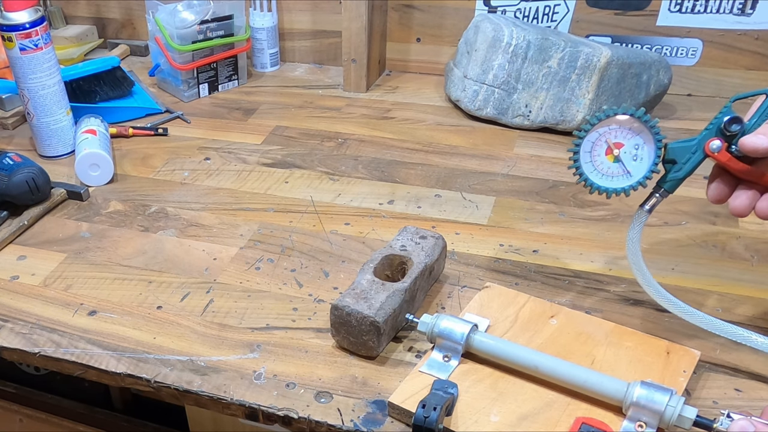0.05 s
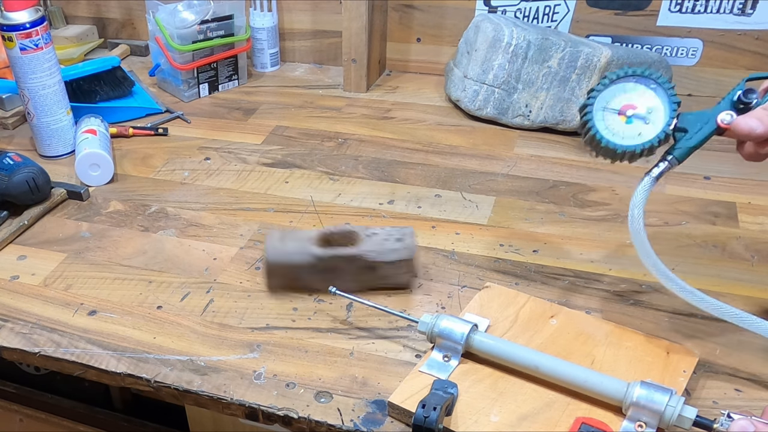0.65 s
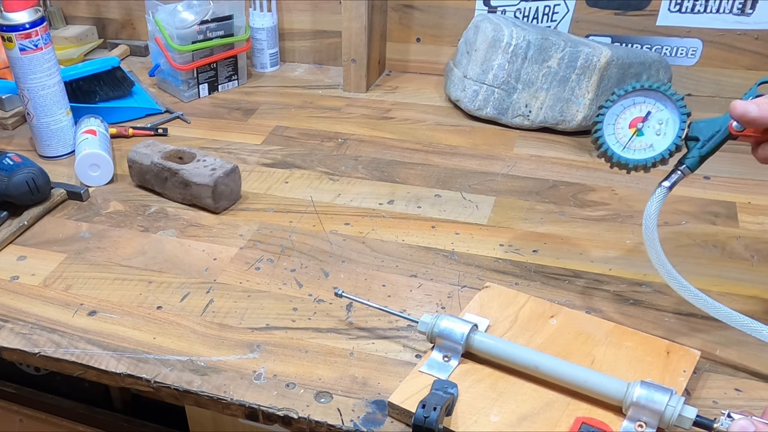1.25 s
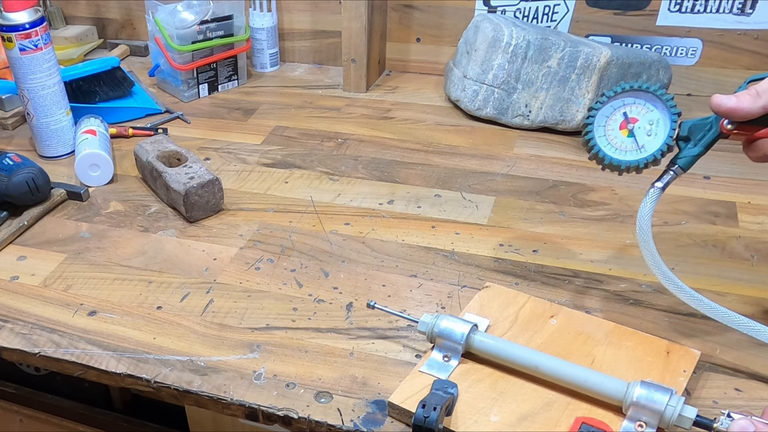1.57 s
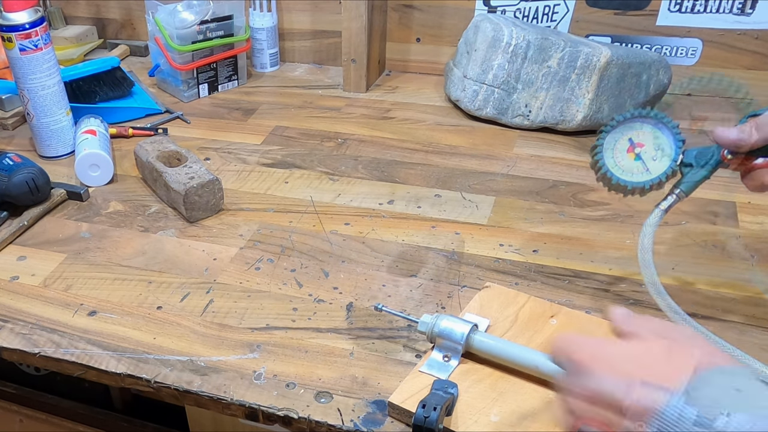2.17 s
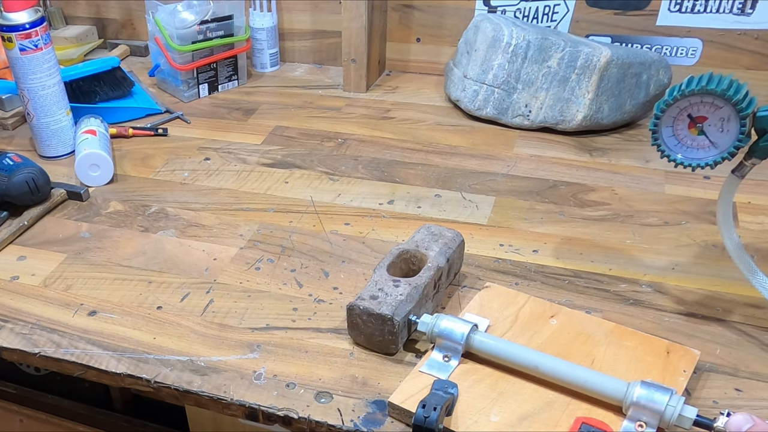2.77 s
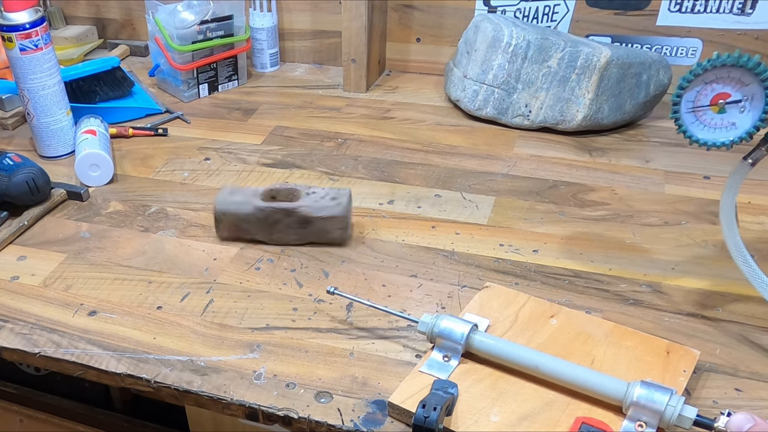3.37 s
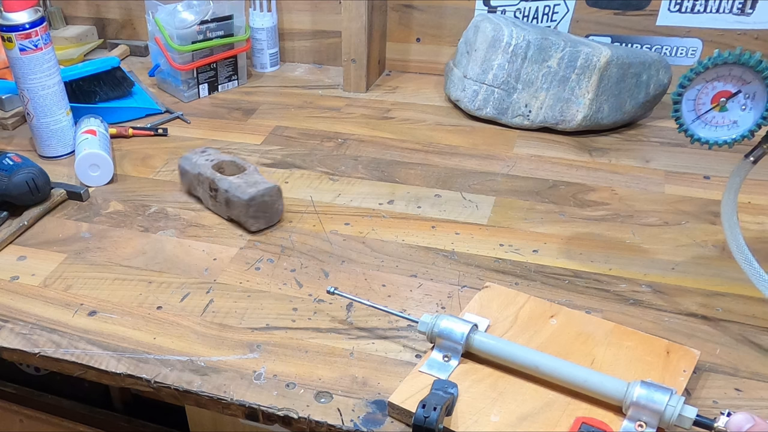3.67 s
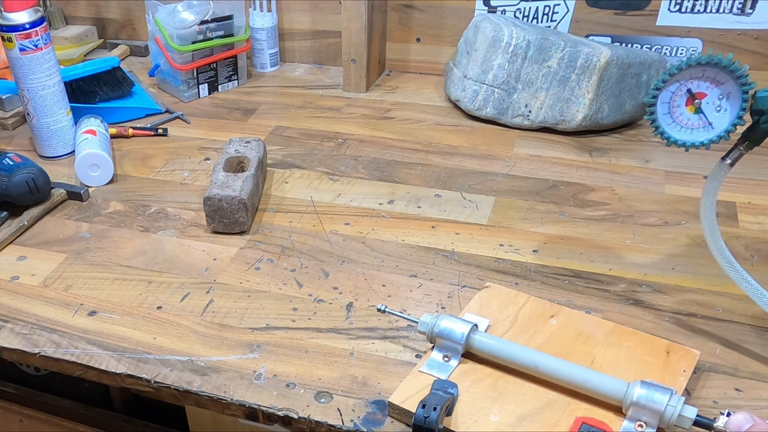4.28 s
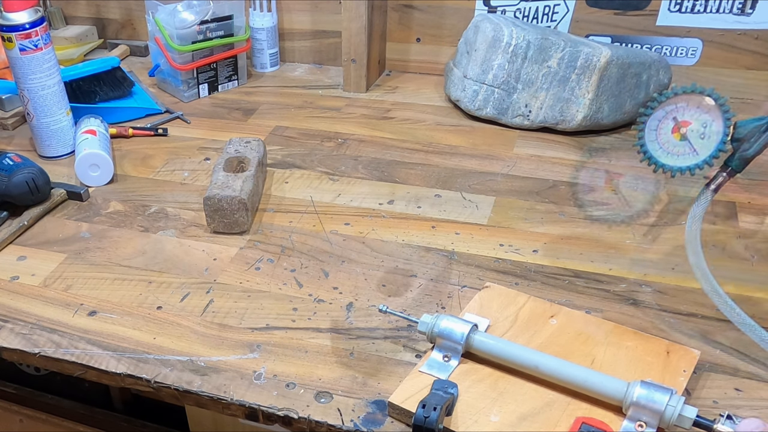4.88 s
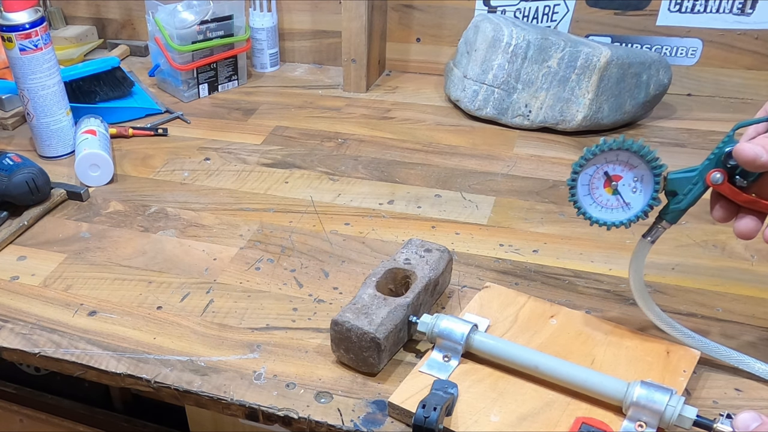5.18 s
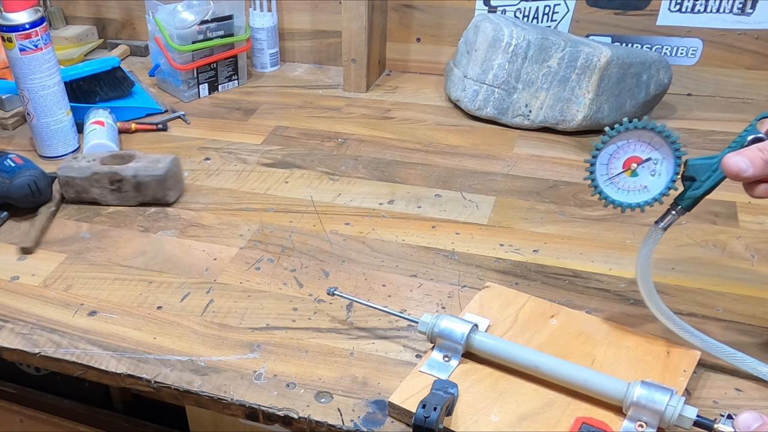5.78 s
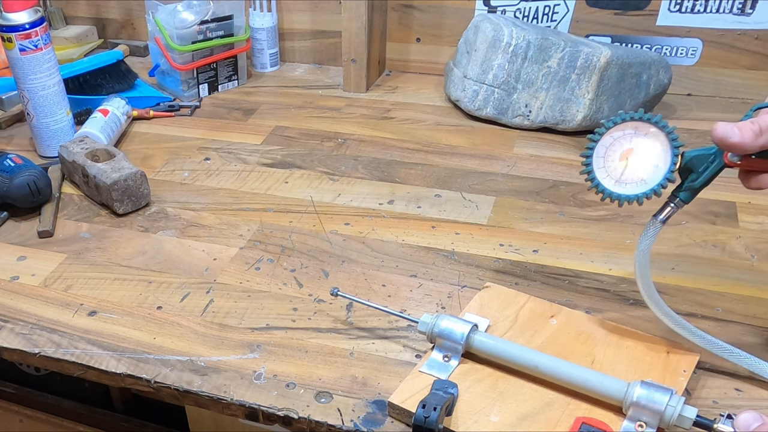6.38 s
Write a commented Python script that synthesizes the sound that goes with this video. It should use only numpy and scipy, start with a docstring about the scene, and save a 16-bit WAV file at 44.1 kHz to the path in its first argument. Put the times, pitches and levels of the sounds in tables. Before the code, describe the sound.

A small compressor hums briefly, then an air piston strikes steel with a clank, a hiss and a wooden scrape, three times over.

```python
"""A quiet workshop, a stereo microphone close to a wooden bench where a spring-return air cylinder shoots
a steel hammer head across the top, three times. Before each shot a little compressor labours and slows.
Air leaks past the piston, the rod strikes, the spring rattles, and the head thumps and slides; it rings
on the first shot, and on the last when it crashes into some tools. After each shot the air vents and
the rod slides home."""
import sys
import numpy as np
from scipy import signal
from scipy.fft import rfft, irfft
from scipy.io import wavfile
from scipy.ndimage import uniform_filter1d

SR = 44100
rng = np.random.default_rng(int(sys.argv[2]) if len(sys.argv) > 2 else 0)


def pcm_store(signal):
    """Save signal as 16-bit PCM."""
    levels = np.round(np.clip(np.atleast_2d(signal), -1, 1) * 32767)
    wavfile.write(sys.argv[1], SR, levels.astype(np.int16).T)


N = 288414
TIME = np.arange(N) / SR
FREQ = np.maximum(np.fft.rfftfreq(N, 1 / SR), 1)


def amp(db):
    """Decibels as a gain."""
    return 10 ** (np.asarray(db) / 20)


def unit(x):
    """Scale to rms 1."""
    return x / np.sqrt(np.mean(x ** 2))


def since(s):
    """Seconds gone by since time s, zero before it."""
    return np.maximum(TIME - s, 0)


def ramp(s, length):
    """Straight rise from 0 to 1 that begins at time s."""
    return np.minimum(since(s) / length, 1)


def coast(s, length, attack, power):
    """Loudness of something set moving at time s and braked evenly by friction: a power of its speed."""
    return ramp(s, attack) * (1 - ramp(s, length)) ** power


def add(track, s, sound):
    """Mix a sound into the track at time s."""
    i = int(s * SR)
    track[i:i + len(sound)] += sound[:N - i]


def colour(x, points, tilt_db=0):
    """Minimum-phase filter through points of Hz and dB, tilted by dB per octave."""
    hz, db = np.transpose(points)
    octaves = np.log2(np.clip(FREQ, 400, 12000) / 2000)
    gain_db = np.interp(np.log(FREQ), np.log(hz), db) + tilt_db * octaves
    cepstrum = irfft(np.log(amp(gain_db)), N)[:2048]
    cepstrum[1:] *= 2
    impulse = irfft(np.exp(rfft(cepstrum, 8192)))[:4096]
    return signal.oaconvolve(x, impulse)[:len(x)]


def noise(spectrum):
    """Steady noise of the given colour, rms 1."""
    return unit(colour(rng.standard_normal(N), spectrum))


def flutter(rate):
    """Smooth random wandering with spread 1."""
    k = int(SR / rate)
    steps = np.repeat(rng.standard_normal(N // k + 1), k)
    return unit(uniform_filter1d(steps, k)[:N])


def contacts(spectrum, per_s, scatter_db):
    """A swarm of tiny random contacts of uneven size, rms 1."""
    clicks = (rng.random(N) < per_s / SR) * rng.choice([-1, 1], N)
    sizes = amp(scatter_db * np.clip(rng.standard_normal(N), -2, 2))
    return unit(colour(clicks * sizes, spectrum))


def place(x, left_db, wet_db, lag_samples=2.17):
    """Sound reaches the right microphone first; bench, wall and shelves answer, alike in the bass."""
    t, t60 = TIME[:SR // 2], 0.2
    early_boost = 1 + 2 * np.exp(-t / 0.013)
    mid, side = rng.standard_normal((2, len(t))) * amp(-60 * t / t60) * (t > .002) * early_boost
    side = 0.12 * side + signal.sosfilt(signal.butter(1, 800, "high", fs=SR, output="sos"), side)
    room = [signal.oaconvolve(x, h / np.linalg.norm(h))[:N] for h in (mid + side, mid - side)]
    taps = np.arange(-16, 17)
    left = np.convolve(x, np.sinc(taps - lag_samples) * np.hanning(len(taps)), "same")
    balance = amp([[left_db / 2], [-left_db / 2]])
    return (np.array([left, x]) + amp(wet_db) * np.array(room)) * balance


def room_air(level_db, side_db, swell_db):
    """Quiet air all around the microphones, partly alike at both, swelling a little."""
    # The room's spectrum. Each row: frequency in Hz, level in dB.
    spectrum = [(12, -41.5), (20, -16.5), (38, -2), (59, -2), (108, -32.5), (139, -12.5), (256, -15),
                (445, -25), (1110, -25), (4080, -42), (15000, -53)]
    mid, side = noise(spectrum), noise(spectrum)
    return (mid + amp(side_db) * side * np.array([[1], [-1]])) * amp(level_db + swell_db * flutter(8.2))


def compressor():
    """One stroke per shaft turn: overtones slide down through the body, the valve puffs and whistles."""
    # Runs of the pump. Each row: start, stall and end in seconds, level of the tone in dB.
    runs = [(0, 0.499, .66, -45.5), (2.27, 2.791, 3.16, -46), (4.987, 5.314, 5.39, -47)]
    # Resonances of the body, then of valve and casing. Each row: centre in Hz, width in Hz, gain in dB.
    body_modes = [(43.1, 20, -5.5), (86, 9.5, -18.5), (211.2, 12, 0), (312, 26, -2.5), (444, 33, -17),
                  (654, 40, -14.5), (718, 62, -26.5)]
    valve_modes = [(167, 60, 3), (700, 100, 0.5), (1325, 480, -6.5), (2220, 210, 2.5), (2935, 130, -8),
                   (3418, 610, -9.5), (4510, 740, -4), (5140, 46, -6), (5700, 30, -9), (7300, 1500, -26.5)]
    free_hz, sag_hz, sag_s = 44.91, 6.8, .36
    whistle_hz, puff_depth = 4150, 0.47
    hum, overtones, valve = np.zeros((3, N))
    flow = colour(rng.standard_normal(N), [(6000, -4.0), (15000, -7.5)])
    hiss = unit(sum(amp(db) * signal.lfilter(*signal.iirpeak(hz, hz / width, fs=SR), flow)
                    for hz, width, db in valve_modes))
    whistle = np.sin(2 * np.pi * np.cumsum(whistle_hz + 9 * flutter(60)) / SR)
    for start, stall, end, run_db in runs:
        on = (TIME >= start) & (TIME < end)
        past_stall = TIME[on] - stall
        # The shaft slows ever faster as the pressure builds; the tone collapses at the stall.
        shaft_hz = np.maximum(free_hz - sag_hz * np.exp(past_stall / sag_s), 10)
        tone_db = run_db - 15 * (1 + np.tanh(past_stall / 0.046)) / 2
        turn = 2 * np.pi * np.cumsum(shaft_hz) / SR
        for k in range(1, 20):
            body = sum(amp(db) / (1 + 2j * (k * shaft_hz - hz) / width) ** 1.58
                       for hz, width, db in body_modes)
            phase = k * turn + rng.uniform(0, 2 * np.pi)
            track = hum if 3 < k < 12 else overtones
            track[on] += amp(tone_db) * np.imag(body * np.exp(1j * phase))
        puffs = 1 - puff_depth * np.sin(turn)
        valve[on] = hiss[on] * amp(-57) * (shaft_hz / free_hz) ** 0.96 * puffs
        overtones[on] += whistle[on] * amp(tone_db - 12.5) * (shaft_hz / shaft_hz[0]) ** 26
    # The low hum stands in the room and is much louder at the right microphone.
    return hum * amp([[-5], [4.5]]) + overtones * amp([[-1], [1]]) + place(valve, left_db=-1, wet_db=-1.3)


def jet(flows, spectrum, flutter_db):
    """Turbulent air through a narrow gap; each flow is a gain and the level of its top end in dB."""
    hiss = noise(spectrum)
    top = irfft(rfft(hiss) / (1 + (8000 / FREQ) ** 8), N)
    air = sum(gain * (hiss - top + amp(treble_db) * top) for gain, treble_db in flows)
    return air * amp(flutter_db * flutter(70))


def wide_hiss(air):
    """The very top of the hiss is diffuse and wide, differing between left and right."""
    top = irfft(rfft(air) / (1 + (10800 / FREQ) ** 16), N)
    return place(air - top, left_db=-0.74, wet_db=-4.5) + amp(-4) * place(top, left_db=-0.5, wet_db=5)


def piston_leak():
    """Air past the piston surges with the stroke, then sinks with the pressure or as the seal seats."""
    # Shots. Each row: valve opening and closing in seconds, level in dB, fall in dB/s, treble in dB.
    shots = [(0.655, 1.443, -27, 16, -9), (3.16, 4.04, -29, 12.5, -10), (5.378, 6.47, -29.5, -1.5, -10.5)]
    # The leak's spectrum. Each row: frequency in Hz, level in dB.
    spectrum = [(100, -15.5), (400, -23), (800, -28.5), (1400, -11), (2200, -6), (3200, -3.5), (4500, -0.5),
                (5600, -1), (7000, -2), (9000, 1), (12000, -4.5), (15000, -19.5)]
    treble_hold = 0.33  # share of the fall that the top of the hiss is spared
    seal_db = 19.5 * (1 - np.exp(-since(5.8) / 0.18))  # the seal seats during the last shot
    flows = []
    for opens, closes, db, fall_db_per_s, treble_db in shots:
        age = since(opens)
        surge_db = 3.5 * np.exp(-age / 0.1)
        fall_db = fall_db_per_s * age + seal_db
        gate = ramp(opens, 0.029) * np.exp(-since(closes) / .02)
        flows.append((gate * amp(db + surge_db - fall_db), treble_db + treble_hold * fall_db))
    return jet(flows, spectrum, flutter_db=0.3)


def knocks(snap, t60):
    """Each blow is a sharp contact and a crack that dies quickly; it also shakes the cylinder's mount."""
    # Blows. Each row: start in seconds, level in dB, tilt in dB per octave, relative clack in dB.
    blows = [(0.6721, -2, 3, -17.5), (.676, -9, -5.5, -22), (1.481, -18.5, 11, -32.5),
             (2.043, -51.5, -13, -35), (3.103, -45, 6, -28), (3.169, -22, 1.5, -9.5), (3.18, -14.5, -4, -9),
             (3.184, -11, 6, -11), (3.228, -14, 4, -23), (3.437, -29, -6, -18), (3.451, -24, -12, -18),
             (4.037, -19, 17, -23), (4.07, -12.5, 7.5, -15.5), (5.3932, -23, -4, -16), (5.3996, -25, -4, 2),
             (5.4041, -12.5, -1.5, -9), (5.467, -9, 3, -21), (5.8156, -1.5, -3.5, -48.5),
             (5.835, -5.5, -4, -24), (5.8561, -10.5, -2.5, -12), (5.888, -13, -2, -25),
             (5.9208, -13.5, -4.5, -22), (5.98, -21, -5, -21), (6.055, -24, 7, -22)]
    # The crack's spectrum. Each row: frequency in Hz, level in dB.
    spectrum = [(100, -18.5), (300, -15.5), (700, -18), (1300, -1), (2000, -1.5), (3000, 1), (4200, -6.5),
                (5500, -2.5), (7500, -12), (11000, -24.5), (15000, -43)]
    # The cylinder on its bracket and board. Each row: mode in Hz, level in dB, t60 in seconds.
    mount_modes = [(1260, -7, 0.04), (1397, 1, 0.09), (1600, 1, 0.065), (1846, -1, 0.14), (2098, -7, 0.05),
                   (3480, -10.5, 0.046), (5700, -13.5, .04)]
    out, t = np.zeros(N), TIME[:SR // 6]
    for s, db, tilt_db, clack_db in blows:
        force = rng.standard_normal(len(t)) * amp(-60 * t / t60)
        force[0] += snap
        crack = colour(force, spectrum, tilt_db)
        clack = sum(amp(mode_db - 60 * t / ring_s) * np.sin(2 * np.pi * hz * rng.normal(1, 0.012) * t)
                    for hz, mode_db, ring_s in mount_modes)
        add(out, s, amp(db) * (crack / np.abs(crack).max() + amp(clack_db) * clack / 2))
    return out


def head_ring(slowing_s, left_lag_rad):
    """The head rings in high modes; as it spins, their lobes sweep past each microphone and beat."""
    # Blows. Each row: start in seconds, level in dB, spot (0 side, 1 corner), spin in Hz, beat depth.
    blows = [(0.6746, -3, 0.1, 22, 0.93), (5.8156, -2.5, 1, 14, 0.49)]
    # The steel head. Each row: mode in Hz, dB struck on the side, dB struck on a corner, t60 in seconds.
    steel_modes = [(6900, -35, -51.5, .6), (7215, -18.5, -19, 0.81), (8784, -21, -29, .5),
                   (9522, -59, -27.5, 1.0), (12880, -44.5, -52, .25), (14770, -70.5, -56, .8)]
    out, t = np.zeros((2, N)), TIME[:SR]
    for s, db, corner, spin_hz, depth in blows:
        angle = 2 * np.pi * spin_hz * slowing_s * (1 - np.exp(-t / slowing_s))
        for hz, side_db, corner_db, t60 in steel_modes:
            fade = amp(db + side_db + corner * (corner_db - side_db) - 60 * t / t60)
            for channel, phase in zip(out, (-left_lag_rad, 0)):
                lobes = 1 + depth * np.cos(angle + rng.uniform(0, 2 * np.pi))
                add(channel, s, fade * lobes * np.sin(2 * np.pi * hz * t + phase))
    return out


def sliding(attack_s, judder_db):
    """Steel catches on the grain of the wood in many tiny slips, and the bench rumbles under it."""
    # Head or rod sliding to a stop. Each row: start and length in seconds, scrape and rumble in dB.
    slides = [(0.678, 0.8, -32, -30), (1.185, 0.5, -45.5, -62), (1.451, 0.22, -30, -31.5),
              (3.044, 0.4, -59.5, -41), (3.188, 0.89, -32, -28), (4.032, 0.27, -34, -40),
              (5.406, 0.79, -33, -30.5), (5.803, 0.29, -32, -28), (6.488, 0.29, -37, -47)]
    # Spectra of scrape and rumble. Each row: frequency in Hz, level in dB.
    scrape_spectrum = [(90, -15), (170, -3.5), (230, -4.5), (305, 1), (400, -2), (500, -1), (750, -7.5),
                       (1100, -4.5), (1500, -2.5), (1950, -11.5), (3000, -13.5), (6000, -24)]
    rumble_spectrum = [(20, -28), (45, -5), (80, -1), (120, -8), (180, -16), (400, -47.5)]
    scrape_gain = sum(amp(db) * coast(s, length, attack_s, power=1.595) for s, length, db, _ in slides)
    rumble_gain = sum(amp(db) * coast(s, length, attack_s, power=2.34) for s, length, _, db in slides)
    scrape = contacts(scrape_spectrum, per_s=2500, scatter_db=4.5) * amp(judder_db * flutter(60))
    return scrape * scrape_gain + noise(rumble_spectrum) * rumble_gain


def spring_rattle():
    """The spring's coils clash in a swarm that swells and dies around the end of each stroke."""
    # Clashes. Each row: loudest moment in seconds, level in dB, spread in seconds.
    clashes = [(0.729, -18, 0.0085), (1.481, -19.5, 0.0064), (3.231, -18.5, 0.013), (4.068, -22, 0.014),
               (5.463, -17.5, 0.015), (6.496, -23, 0.013)]
    # The coils' spectrum. Each row: frequency in Hz, level in dB.
    spectrum = [(150, -13.5), (400, -6.5), (800, -6), (1400, 0), (2100, -4.5), (3200, 3), (4200, 0.5),
                (5400, 5), (7000, -16), (9000, -11.5), (12000, -20.5), (15000, -30.5)]
    swell = sum(amp(db) * np.exp(-np.minimum(((TIME - s) / spread) ** 2, 50) / 2)
                for s, db, spread in clashes)
    return swell * contacts(spectrum, per_s=4000, scatter_db=6.2)


def bench_thumps():
    """A half-sine push bends the bench top; a longer contact leaves only its lowest modes."""
    # The heavy head landing. Each row: start in seconds, peak in dB, contact time in seconds.
    landings = [(0.751, -14, 0.0036), (0.761, -16.5, 0.0035), (.915, -35, 0.0055), (3.225, -28, 0.0058),
                (3.249, -17, 0.0024), (3.334, -23, 0.0048), (3.446, -39, 0.0012), (3.549, -26, 0.0026),
                (3.626, -29, 0.0047), (5.509, -12, 0.0053), (5.555, -13, 0.0023)]
    # The bench top. Each row: mode in Hz, level in dB, t60 in seconds.
    bench_modes = [(73.2, 8, 0.23), (76.4, -0.5, 0.24), (112.5, -16, .14), (140, -12.5, 0.14),
                   (181.2, -19, .15), (289.4, -16.5, 0.1374), (322, -2.5, 0.61), (488, -17.5, .1),
                   (565, -11, .12)]
    out, t = np.zeros(N), TIME[:SR // 2]
    bench = sum(amp(db - 60 * t / t60) * np.sin(2 * np.pi * hz * t) for hz, db, t60 in bench_modes)
    for s, db, contact in landings:
        push = -np.sin(np.pi * t[t < contact] / contact)
        boom = signal.fftconvolve(bench, push)
        add(out, s, amp(db) * boom / np.abs(boom).max())
    return out


def chatter(jitter, rough_db):
    """Stick and slip settles for a moment into a rough tone, mostly sinking as the head slows."""
    # The head on the wood. Each row: start and end in seconds, first and last pitch in Hz, level in dB.
    spells = [(0.765, 0.883, 322, 295, -36), (0.871, 1.016, 1453, 1520, -42.5),
              (1.287, 1.444, 308.4, 276, -49), (3.292, 3.37, 302, 290, -37),
              (3.435, 3.471, 313, 293, -29.5), (3.438, 3.528, 571.4, 528, -38.5),
              (3.631, 3.778, 563.6, 466, -40.5), (5.576, 5.66, 328.5, 285, -31.5),
              (5.63, 5.817, 1453, 1446, -37)]
    out, unsteady = np.zeros(N), flutter(500)
    for start, end, from_hz, to_hz, db in spells:
        on = (TIME >= start) & (TIME < end)
        progress = np.linspace(0, 1, on.sum())
        hz = from_hz + (to_hz - from_hz) * progress
        phase = 2 * np.pi * np.cumsum(hz + jitter * np.sqrt(hz) * unsteady[on]) / SR
        out[on] += np.sqrt(2) * amp(db) * np.sin(np.pi * progress) * np.sin(phase)
    return out * unit(amp(rough_db * flutter(160)))


def valve_vent():
    """Air leaves the valve with a pop and dies ever faster as the pressure runs out."""
    # Ventings. Each row: start and attack in seconds, level in dB, seconds to empty, pop and treble in dB.
    vents = [(1.461, 0.0091, -32, 0.58, 13.5, -7.5), (2.02, 0.055, -62.5, 0.15, 1.5, -9),
             (4.035, 0.0071, -26, 0.48, 2, 3.5), (4.84, 0.13, -64.5, 0.11, 1, -4.5),
             (6.454, 0.022, -29.5, 0.25, 7.5, -3.5)]
    # The vent's spectrum. Each row: frequency in Hz, level in dB.
    spectrum = [(400, -17.5), (550, -7.5), (800, -15), (1400, -3), (2100, -4), (3000, 1), (4200, 2.5),
                (5400, 1.5), (7000, -3.5), (9000, -2), (12000, -11), (15000, -22)]
    flows = []
    for s, attack, db, empty_s, pop_db, treble_db in vents:
        age = since(s + attack)
        fall_db = 60 * np.minimum(age / empty_s, 2) ** 2.05
        gain = ramp(s, attack) * amp(db + pop_db * np.exp(-age / 0.027) - fall_db)
        flows.append((gain, treble_db))
    return jet(flows, spectrum, flutter_db=0.58)


def tool_crash(start_s):
    """Tools jostle briefly in many small metal contacts after the head runs into them."""
    # The tools' spectrum. Each row: frequency in Hz, level in dB.
    spectrum = [(40, -19), (100, 3.5), (300, -4), (700, -5), (1300, 1.5), (1800, 5.5), (2500, 2.5),
                (4200, -5.5), (5500, -8), (11000, -25), (15000, -54)]
    swell = amp(-23.5) * coast(start_s, length=0.2, attack=0.0083, power=0.79)
    return swell * contacts(spectrum, per_s=1100, scatter_db=1.7)


def scene():
    """Bench, compressor and room as they reach the two microphones."""
    air = piston_leak() + valve_vent()
    metal = knocks(snap=6.2, t60=.031) + spring_rattle()
    tools = tool_crash(start_s=5.82)
    slide = sliding(attack_s=.035, judder_db=2.5) + amp(-0.5) * chatter(jitter=2.65, rough_db=4.1)
    return (amp(-0.3) * wide_hiss(air)
            + place(metal, left_db=0, wet_db=-9.5)
            + place(tools, left_db=2.9, wet_db=-6.5, lag_samples=.3)
            + place(slide, left_db=0, wet_db=-3.5, lag_samples=1.7)
            + place(bench_thumps(), left_db=0.497, wet_db=-29)
            + head_ring(slowing_s=0.46, left_lag_rad=1.73)
            + compressor()
            + room_air(level_db=-70, side_db=-1.8, swell_db=0.81))


def record(dry):
    """The microphone, duller on the left, drops the deepest rumble, rounds the peaks and cuts the top."""
    low_hz, top_hz, ceiling = 36, 15650, .72
    left_gain = amp(-3.5 / (1 + (11000 / FREQ) ** 8))
    stereo = irfft(rfft(dry) * np.array([left_gain, np.ones_like(FREQ)]), N)
    stereo = signal.sosfilt(signal.butter(2, low_hz, "high", fs=SR, output="sos"), stereo)
    stereo = stereo / (1 + (stereo / ceiling) ** 4) ** .25
    return signal.sosfilt(signal.ellip(10, .2, 80, top_hz, fs=SR, output="sos"), stereo)


dry = scene()
out = record(dry)
pcm_store(out)
```